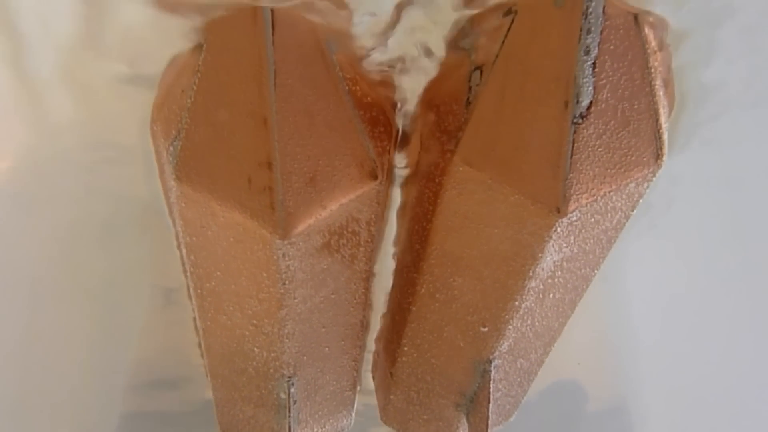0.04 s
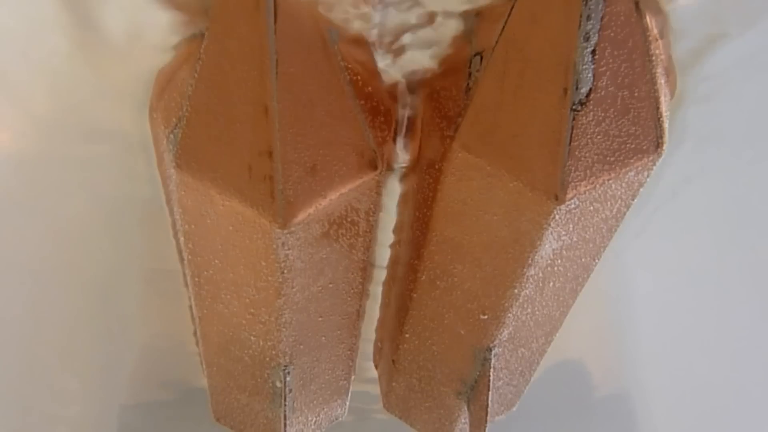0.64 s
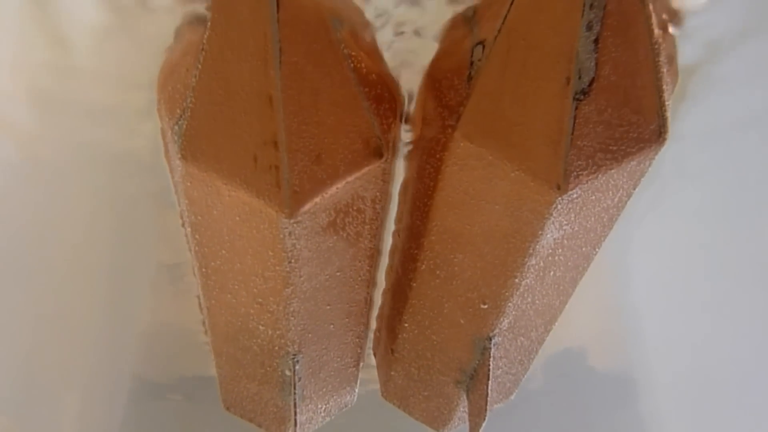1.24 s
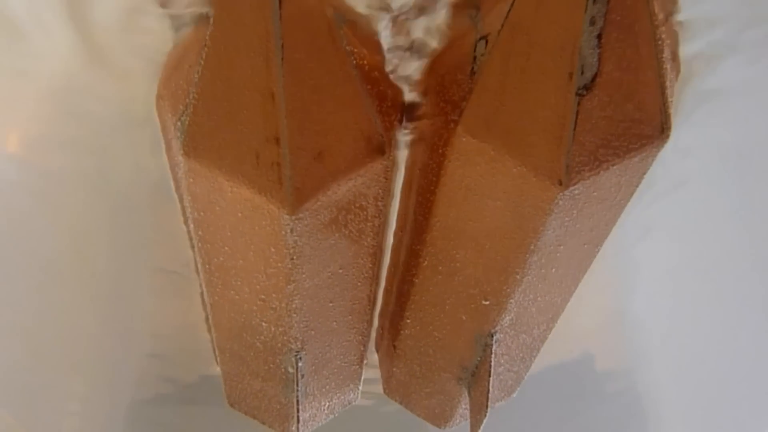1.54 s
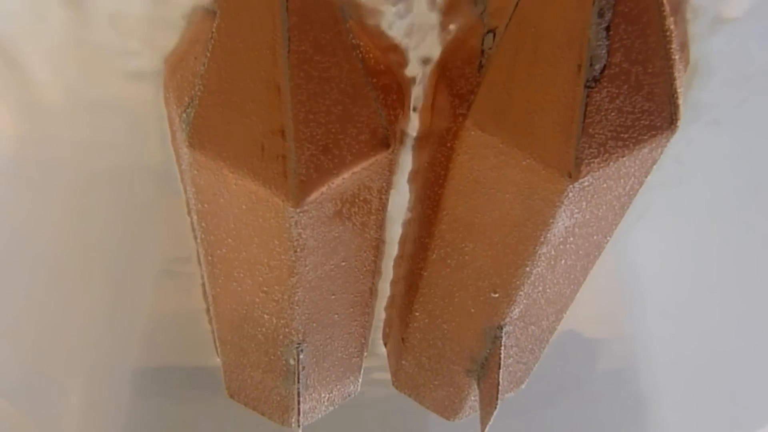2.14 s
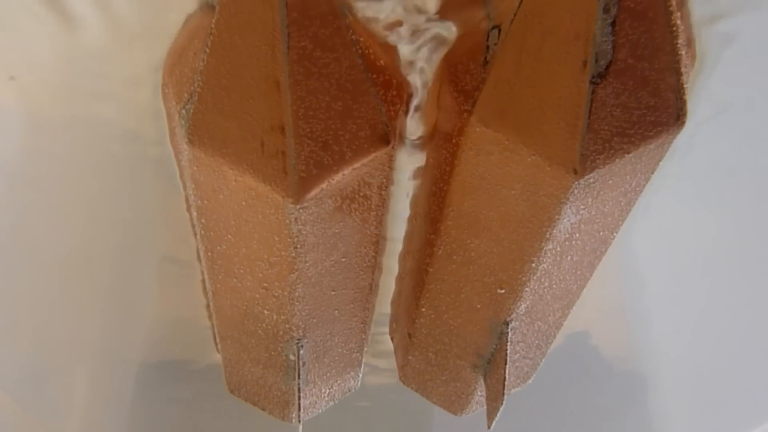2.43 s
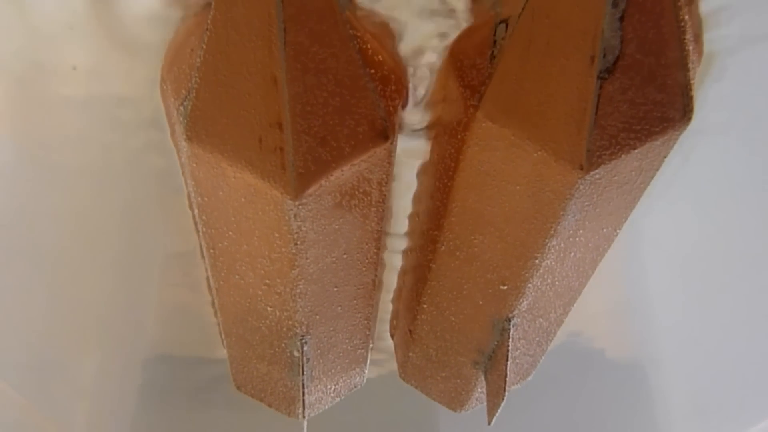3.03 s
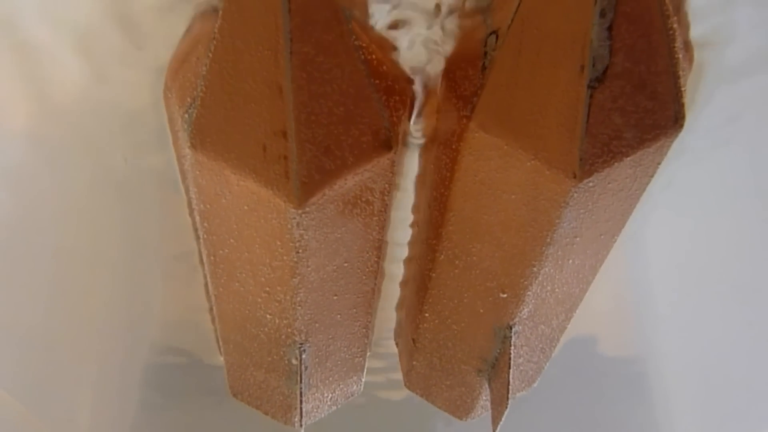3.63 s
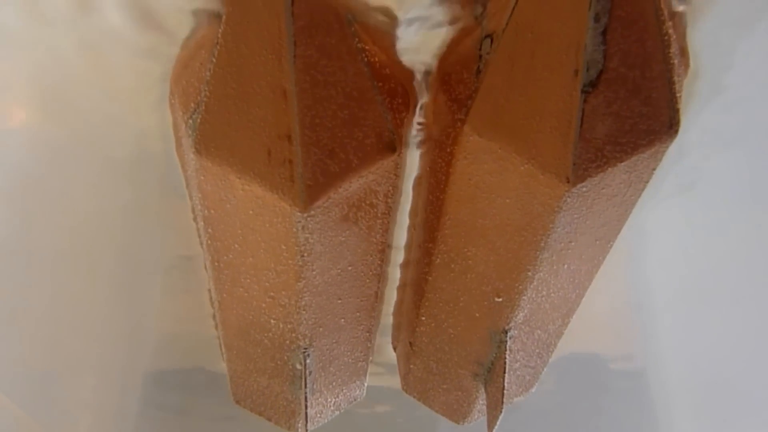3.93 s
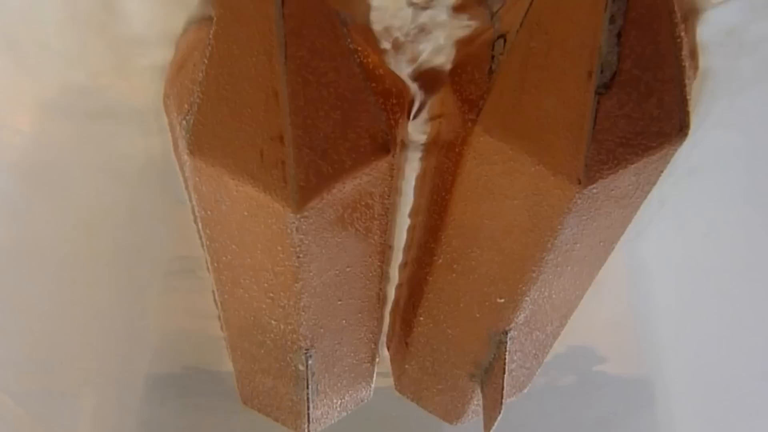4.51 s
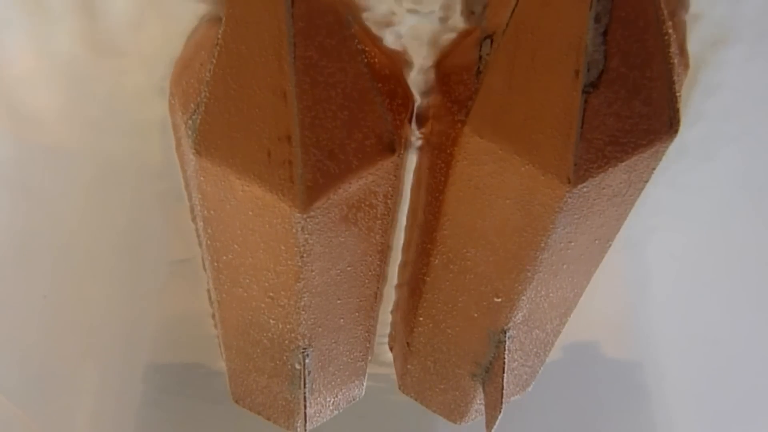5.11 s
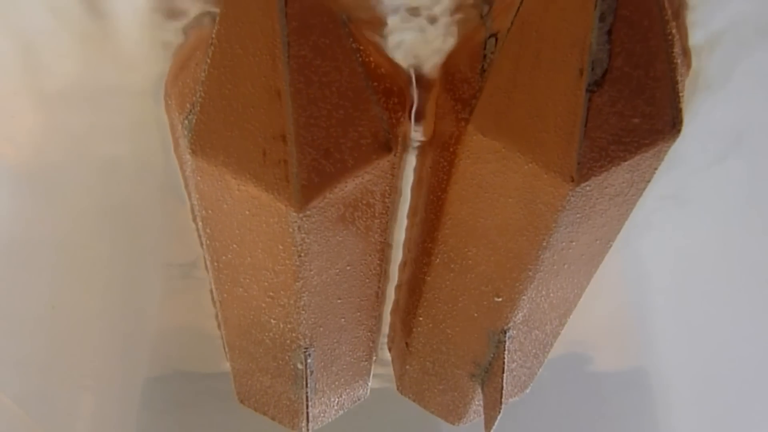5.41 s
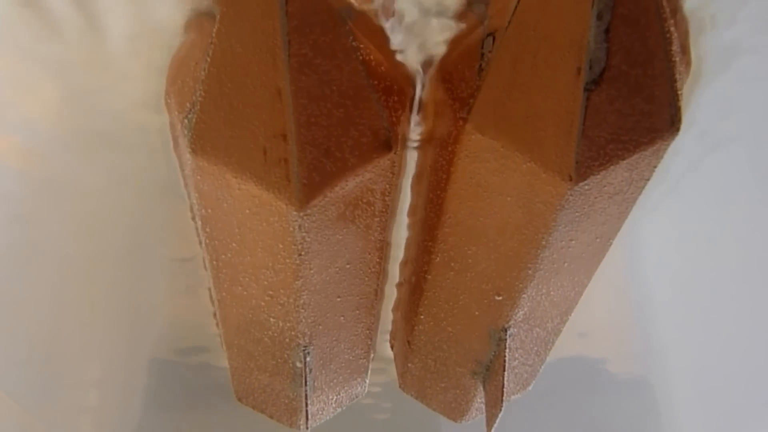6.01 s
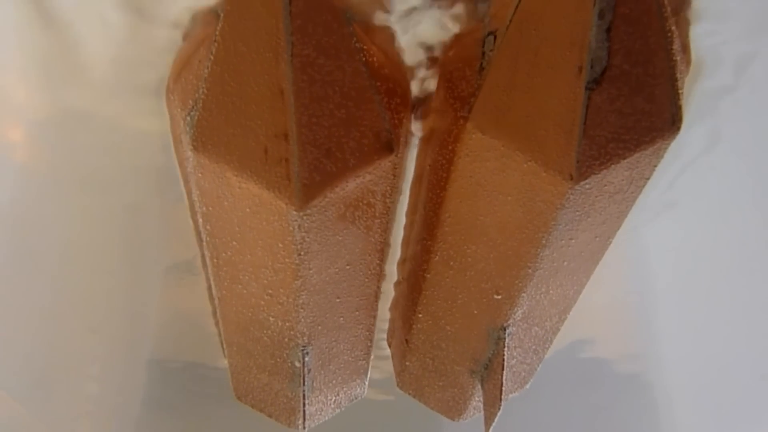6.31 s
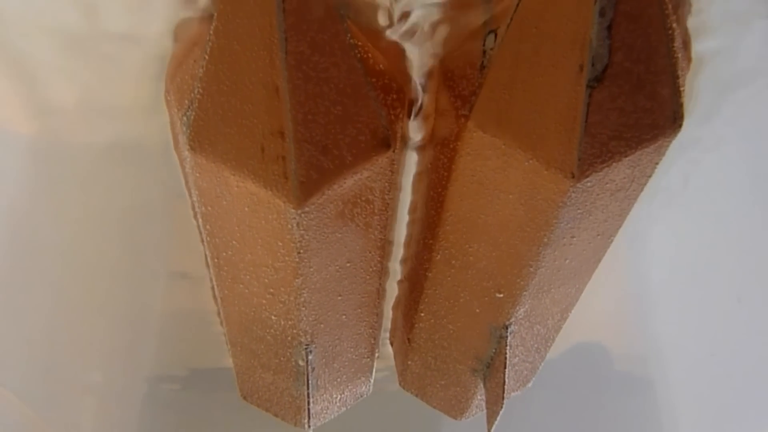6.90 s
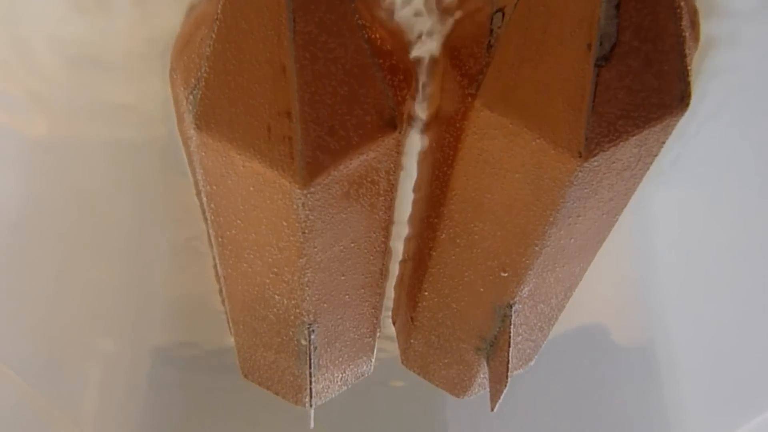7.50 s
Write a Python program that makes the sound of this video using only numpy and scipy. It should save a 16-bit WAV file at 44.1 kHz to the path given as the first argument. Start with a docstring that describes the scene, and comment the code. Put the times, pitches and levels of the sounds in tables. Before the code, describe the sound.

Small submerged pumps hum steadily under softly churning, bubbling water, with a few light clicks and bumps.

```python
"""Small mains-driven pumps hum under water, close by: a deep motor note under wavering overtones.
Their stream churns through a narrow tank; bubbles ring its resonances and a few plink, over a faint hiss.
From 1 s come scattered dry clicks, then soft bumps and gritty scratches, bunching with a gulp at 3.1 s.
At the hardest click, just after 6 s, the deep note sags; it swells back as the stream builds to the end."""
import sys
import numpy as np
from scipy import signal
from scipy.io import wavfile

SR = 44100
rng = np.random.default_rng(int(sys.argv[2]) if len(sys.argv) > 2 else 0)


def inscribe(sig):
    """Save sig as 16-bit PCM at rate SR to the path in sys.argv[1].

    A 1-D sig is mono; a 2-D sig holds one channel per row.
    Samples are clipped to [-1, 1] before scaling.
    """
    pcm = np.round(np.clip(np.atleast_2d(sig).T, -1, 1) * 32767)
    wavfile.write(sys.argv[1], SR, pcm.astype(np.int16))


N = 341775
TIME = np.arange(N) / SR
MAINS_HZ = 60.01

# strength of the stream, easing slowly and then building: time_s, level_db
FLOW = [(0.0, -64), (0.71, -63), (1.21, -65.5), (2.22, -63.5), (2.98, -65), (4.47, -64), (5.46, -67),
        (6.13, -66), (7.34, -58), (7.75, -57.5)]


def from_db(db):
    """Decibels to gain."""
    return 10 ** (np.asarray(db) / 20)


def rms_one(x):
    """Scale to unit power."""
    return x / np.sqrt(np.mean(x ** 2) + 1e-20)


def drift(rate_hz):
    """Slow random motion with a spread of 1."""
    step, run_in = 40, 2000  # samples per step, steps to settle
    pole = np.exp(-2 * np.pi * rate_hz * step / SR)
    white = rng.standard_normal(N // step + run_in + 2)
    slow = signal.lfilter([1], [1, -2 * pole, pole * pole], white)[run_in:]
    return np.interp(np.arange(N) / step, np.arange(len(slow)), rms_one(slow))


def resonate(x, hz, width_hz):
    """One resonance; white noise keeps its power in passing."""
    r = np.exp(-np.pi * width_hz / SR)
    b = np.sqrt((1 - r * r) / 2) * np.array([1, 0, -1])
    return signal.lfilter(b, [1, -2 * r * np.cos(2 * np.pi * hz / SR), r * r], x + 1e-18)


def low_pass(x, hz, order):
    """Roll off the top."""
    return signal.sosfilt(signal.butter(order, hz, fs=SR, output="sos"), x)


def high_pass(x, hz, order):
    """Roll off the bottom."""
    return signal.sosfilt(signal.butter(order, hz, "high", fs=SR, output="sos"), x)


def banded_noise(spectrum, patchy_db, patch_hz):
    """Half-octave bands of noise, each swelling on its own; unit power overall."""
    edges = 25 * 2 ** np.arange(0, 9.6, .5)
    points_hz, points_db = np.transpose(spectrum)
    out, white = 0, rng.standard_normal((2, N))
    for k, (low, high) in enumerate(zip(edges, edges[1:])):
        band = signal.sosfilt(signal.butter(3, [low, high], "band", fs=SR, output="sos"), white[k % 2])
        level_db = np.interp(np.log(low * high) / 2, np.log(points_hz), points_db)
        out += band * from_db(level_db + patchy_db * drift(patch_hz))
    return rms_one(out)


def damped_notes(rows, rise_cycles):
    """Sines with a quick attack and a dying tail, from rows of start_s, level_db, pitch_hz, t60_s."""
    out = np.zeros(N)
    for start_s, level_db, hz, t60_s in rows:
        start = round(start_s * SR)
        age = TIME[:min(N - start, round(2 * t60_s * SR))]
        envelope = from_db(level_db - 60 * age / t60_s) * (1 - np.exp(-age * hz / rise_cycles))
        out[start:start + len(age)] += envelope * np.sin(2 * np.pi * hz * age)
    return out


def motors():
    """The magnetic pull peaks twice a turn for the deep note; rotor imbalance adds the turn itself."""
    turn, sag = 2 * np.pi * MAINS_HZ * TIME, sag_db()
    rise_db_per_s = 0.22
    drone = from_db(-39.5 + rise_db_per_s * TIME - sag) * np.sin(2 * turn)
    imbalance = from_db(-74 - 0.67 * sag) * np.sin(turn)
    return np.sqrt(2) * (drone + imbalance)


def impellers():
    """Overtones that grow with the flow; the water's uneven load shakes each in level and phase."""
    # overtones of the pumps: mains_multiple, relative_db, unsteadiness (0-1)
    overtones = [(3, -23, 0.4), (4, -6.5, 0.17), (5, 2.5, 0.19), (6, -11, 0.56), (7, -17, 0.31),
                 (8, -28, .5), (12, -29, 0.3), (13, -32, 0.8), (15, -37, 1)]
    # the impeller sits at any angle on its shaft and lags a little as the load changes
    angle = 2 * np.pi * MAINS_HZ * TIME + rng.uniform(0, 2 * np.pi) + .03 * drift(.6)
    hum = 0
    for multiple, relative_db, unsteadiness in overtones:
        shake = 1 + unsteadiness * (drift(12.3) + 1j * drift(6.3)) / np.sqrt(2)
        # speed ripples within each turn: sidebands sway the fifth multiple more in phase than in level
        phase = multiple * angle + np.pi / 2 * abs(multiple - 5)
        sway = 0.29 * drift(1.1)
        hum += from_db(relative_db) * np.real(shake * np.exp(1j * (phase + sway)))
    flow_db = np.interp(TIME, *np.transpose(FLOW))
    load_db = 0.8 * (flow_db - flow_db.mean()) + 1.02 * drift(2.2)
    return np.sqrt(2) * from_db(-47.5 + load_db) * hum


def bubbles(per_s, spread_db):
    """Bubbles of uneven size burst at random and ring the tank; the water muffles their upper edge."""
    # resonances of the tank: pitch_hz, width_hz, level_db
    tank = [(261, 26, 0), (343.3, 53, 3), (454, 48, -9.5), (772, 64, 0.5), (843, 100, -9),
            (1214, 81, -15.5), (1754, 200, -18), (3390, 620, -21.5)]
    out = 0
    for hz, width_hz, level_db in tank:
        bursts = rng.random(N) < per_s * from_db(3 * drift(8)) / SR
        sizes = from_db(spread_db * np.minimum(rng.exponential(1, N), 4)) * rng.choice([-1, 1], N)
        ringing = low_pass(resonate(bursts * sizes, hz, width_hz), 2 * hz, order=2)
        out += from_db(level_db) * rms_one(ringing)
    return out


def water(throb_depth):
    """The stream throbs with the motors; as it strengthens, the burble grows faster than the rush."""
    # colour of the churning water: frequency_hz, density_db
    churn = [(25, -26.5), (60, -16), (130, -1.5), (230, 2), (320, 13), (430, 6.5), (620, -10), (900, -9.5),
             (1200, -15.5), (1800, -26), (2400, -24), (5000, -31.5), (10000, -35), (15000, -41)]
    flow = from_db(np.interp(TIME, *np.transpose(FLOW)))
    swing = flow / flow.mean()
    rush = swing ** 0.55 * from_db(5) * banded_noise(churn, patchy_db=2.5, patch_hz=11)
    burble = swing ** 1.01 * from_db(-2) * bubbles(per_s=900, spread_db=2)
    # one gulp: a brief, dull surge in the stream
    gulp_s, half_length_s = 3.129, 0.01
    surge = from_db(15) * np.exp(-((TIME - gulp_s) / half_length_s) ** 2)
    gulp = surge * low_pass(rush + burble, hz=640, order=2)
    turn = 2 * np.pi * MAINS_HZ * TIME
    throb = 1 + throb_depth * (np.sin(turn) + np.sin(2 * turn))
    return flow.mean() * (rush + burble + gulp) * throb


def hiss():
    """A faint, nearly steady bed of noise."""
    # colour of the hiss: frequency_hz, density_db
    colour = [(100, 5.5), (3000, 1), (6000, 0.5), (11000, -3), (16000, -6)]
    return from_db(-79) * banded_noise(colour, patchy_db=-0.5, patch_hz=2)


def churn_peaks(pitch_hz, ring_cycles, gain_db):
    """The churning water peaks faintly for a few cycles near the tank's clearest resonance."""
    # brief peaks of the churn: start_s, level_db
    peaks = [(0.228, -51), (1.251, -43.5), (1.679, -45), (2.172, -47), (4.526, -49), (5.077, -43),
             (6.926, -49), (7.194, -42), (7.361, -45), (7.442, -45)]
    notes = [(s, level_db + gain_db, pitch_hz, ring_cycles / pitch_hz) for s, level_db in peaks]
    return damped_notes(notes, rise_cycles=0.13)


def plinks():
    """Tiny bubbles ring high and die at once."""
    # tiny bright bubbles: start_s, level_db, pitch_hz, t60_s
    notes = [(.5435, -53.5, 7500, .005), (1.8442, -54, 3960, .011), (2.6598, -59, 3970, .009),
             (7.6575, -55.5, 3440, 0.0079)]
    return damped_notes(notes, rise_cycles=0.76)


def clicks(relax_hz, gain_db):
    """Each click is a sudden jump of pressure that leaks away in about a millisecond."""
    # dry clicks: start_s, level_db
    hits = [(1.0095, -42.5), (1.0306, -37), (1.033, -49), (1.0616, -49.5), (1.1178, -38), (1.1213, -47),
            (1.1392, -52), (2.6335, -48), (3.1613, -47.5), (4.429, -51), (5.42, -55), (6.0693, -34),
            (6.0719, -29.5), (6.0834, -37), (6.1118, -53)]
    jumps = np.zeros(N)
    for start_s, level_db in hits:
        jumps[round(start_s * SR)] = from_db(level_db + gain_db) * rng.choice([-1, 1])
    pressure = signal.lfilter([1], [1, -np.exp(-2 * np.pi * relax_hz / SR)], jumps + 1e-18)
    return high_pass(low_pass(pressure, hz=6600, order=1), hz=71, order=2)


def sag_db():
    """The deep note ducks quickly at some of the knocks; the deeper the dip, the slower the release."""
    # dips in the deep note: start_s, depth_db
    sags = [(1.01, 4.5), (1.118, 1.1), (2.6335, 2.0), (3.13, 2), (4.429, 1.7), (6.068, 15)]
    attack_s, release_s_per_db = 0.0066, 0.15
    out = 0
    for start_s, depth_db in sags:
        age = np.maximum(TIME - start_s, 0)
        out += depth_db * (1 - np.exp(-age / attack_s)) * np.exp(-age / (release_s_per_db * depth_db))
    return out


def bumps():
    """Soft contacts give a low note that the water quickly damps."""
    # soft bumps: start_s, level_db, pitch_hz, t60_s
    contacts = [(1.691, -41, 220, .09), (3.123, -39, 182, 0.047), (3.1279, -24, 227, 0.052),
                (3.131, -33, 483, 0.068), (4.413, -40.5, 102, 0.081), (6.0703, -29, 192, 0.088)]
    return high_pass(damped_notes(contacts, rise_cycles=0.22), hz=80, order=3)


def scratches():
    """Brief bursts of friction ring a hard shell."""
    # gritty scratches: start_s, level_db, decay_s
    scrapes = [(1.8437, -56, .0009), (1.8927, -67, .001), (2.569, -64, .0005), (2.659, -54.5, .00065),
               (3.086, -63, .001), (3.102, -68, .026), (3.1214, -52, .0017), (3.1242, -44.5, 0.00066),
               (3.128, -46, 0.00091), (3.1617, -60, .0007)]
    # resonances of the shell: pitch_hz, width_hz, level_db
    shell = [(1440, 480, -4.5), (4080, 430, -2.5), (7300, 1200, -6), (9600, 1200, -5), (11200, 890, -2),
             (13900, 1500, -10)]
    force = ringing = 0
    for start_s, level_db, decay_s in scrapes:
        force += from_db(level_db) * (TIME >= start_s) * np.exp(-np.abs(TIME - start_s) / decay_s)
    friction = force * rng.standard_normal(N)
    for k, (hz, width_hz, level_db) in enumerate(shell):
        ringing += (-1) ** k * from_db(level_db) * resonate(friction, hz, width_hz)
    return from_db(-0.5) * ringing


def scene():
    """A mono mix of pumps, water and small contacts over a faint hiss."""
    snaps = clicks(relax_hz=437, gain_db=6)
    stream = water(throb_depth=.16) + churn_peaks(pitch_hz=750, ring_cycles=7, gain_db=0.5) + plinks()
    return (hiss() + motors() + impellers() + stream + snaps + bumps() + scratches())[None]


def record(dry):
    """The recorder has two narrow notch filters, at 2.9 and 7.9 kHz, and cuts the top steeply."""
    # the recorder's notch filters: centre_hz, width_hz
    notches = [(2900, 220), (7860, 100)]
    cutoff_hz = 15800
    for hz, width_hz in notches:
        dry = signal.lfilter(*signal.iirnotch(hz, hz / width_hz, fs=SR), dry)
    return signal.sosfilt(signal.ellip(10, .1, 70, cutoff_hz, fs=SR, output="sos"), dry)


dry = scene()
out = record(dry)
inscribe(out)
```